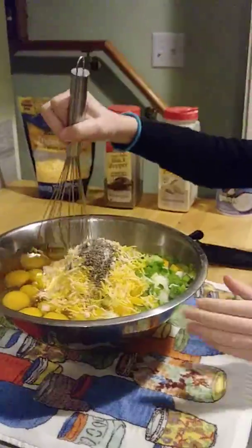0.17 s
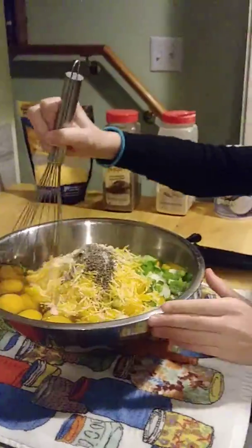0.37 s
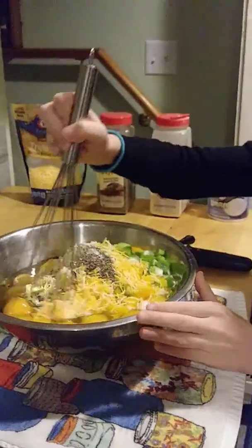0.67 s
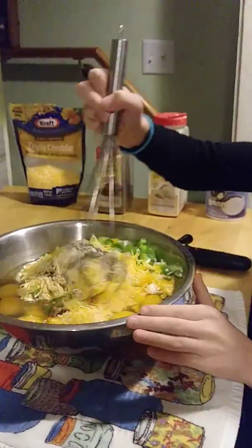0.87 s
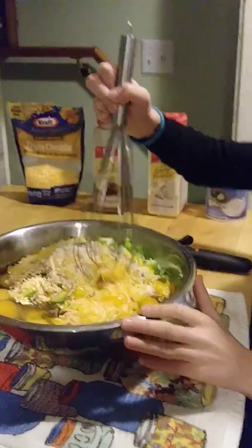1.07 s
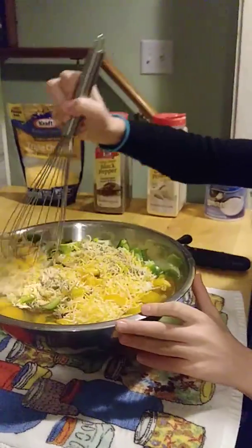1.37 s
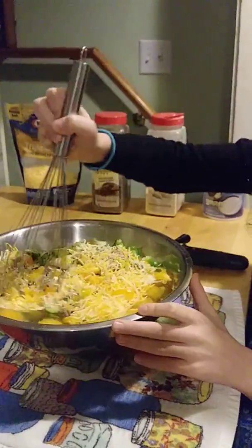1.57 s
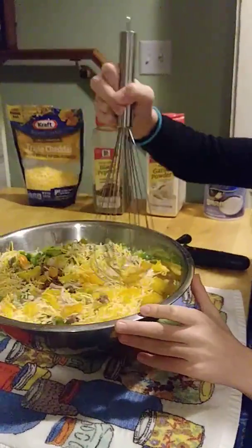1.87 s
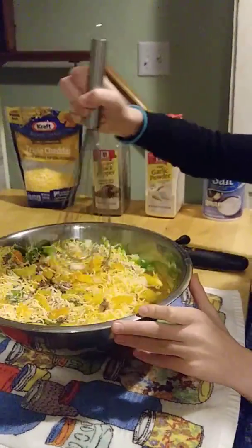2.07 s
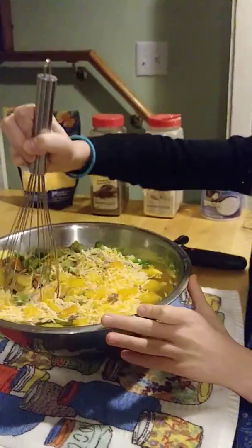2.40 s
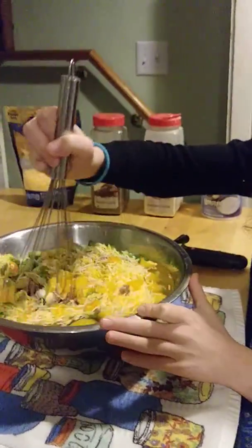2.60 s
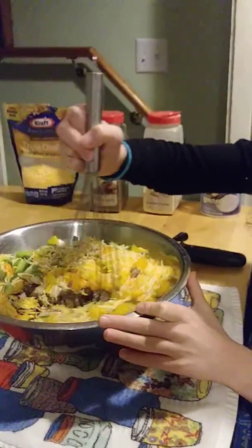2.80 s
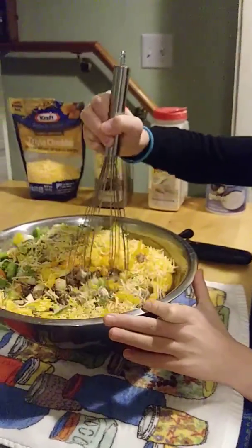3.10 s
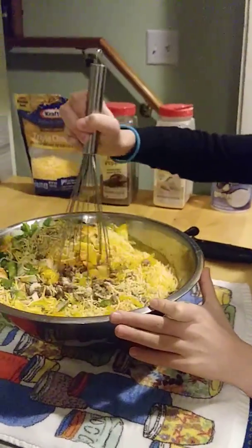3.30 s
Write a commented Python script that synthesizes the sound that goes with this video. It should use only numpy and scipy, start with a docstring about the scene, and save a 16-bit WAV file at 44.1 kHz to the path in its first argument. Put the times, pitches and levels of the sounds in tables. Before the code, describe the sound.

A wire whisk clanks hard against a steel mixing bowl while stirring eggs, with soft wet swishing between.

```python
"""Whisking egg in a steel bowl

A wire whisk stirs egg mixture in a steel bowl in a small kitchen. Hard clinks, sums of dying bowl modes
plus a burst of wire noise, overload the microphone. Dull bumps of the bowl on the table are short low
pulses with resonant noise. Faint scraping is a train of tiny slips ringing the damped bowl, swishing is
hiss with random level patches as a noise suppressor leaves, and slopping is such noise in a wandering
resonance. An appliance hums faintly in sines."""
import sys
import numpy as np
from scipy import signal
from scipy.fft import rfft, irfft
from scipy.io import wavfile
from scipy.ndimage import uniform_filter1d, minimum_filter1d

SR = 44100
rng = np.random.default_rng(int(sys.argv[2]) if len(sys.argv) > 2 else 0)


def undo_db(level):
    """Turn decibels back into plain size, where 20 dB means ten times bigger."""
    steps = np.asarray(level, float) / 20
    return 10 ** steps


def transcribe(u):
    """Save the signal u as a 16-bit wav file named by the first command-line argument.

    u: samples, shape (n,) or (channels, n), limited to [-1, 1]; the rate is SR.
    q: integer samples, one column per channel.
    """
    v = np.clip(np.atleast_2d(u).T, -1, 1)
    q = np.round(v * 32767).astype(np.int16)
    wavfile.write(sys.argv[1], SR, q)


N = 152145
HOLD_S = 0.022  # the last level of a stroke is held this long, up to the next hit


def evened(x):
    """Normalisation: scales a signal to unit rms."""
    return x / np.sqrt(np.mean(x ** 2) + 1e-20)


def read(points, hz):
    """Spectral envelope: interpolates a table on a log-frequency axis."""
    table_hz, value = np.transpose(points)
    return np.interp(np.log(hz + 1), np.log(table_hz + 1), value)


def add(mix, s, sound):
    """Superposition: adds a sound into the mix from a given time on."""
    part = mix[max(round(s * SR), 0):][:len(sound)]
    part += sound[:len(part)]


def level(strokes):
    """Amplitude envelope: gain from the level curves of separate strokes, silent between."""
    t, gain = np.arange(N) / SR, np.zeros(N)
    for stroke in strokes:
        s, db = np.transpose(stroke)[:2]
        sounding = (t > s[0]) * (t < s[-1] + HOLD_S)
        gain += undo_db(np.interp(t, s, db)) * sounding
    return uniform_filter1d(gain, size=300)


def noise(tone, patchy_db, wide, long):
    """Coloured noise: random spectra with level patches, wide in bins and long in frames."""
    real, imaginary, patches = rng.standard_normal((N // 128 + 5, 257, 3)).T
    patches = uniform_filter1d(patches, size=wide, axis=0)
    patches = evened(uniform_filter1d(patches, size=long, axis=1))
    colour_db = read(tone, np.fft.rfftfreq(512, 1 / SR))[:, None]
    spectra = (real + 1j * imaginary) * undo_db(colour_db + patchy_db * patches)
    return evened(signal.istft(spectra, nperseg=512, noverlap=384)[1][:N])


# frequencies at which the spot table is given [Hz]
SPOT_FREQUENCIES = [500, 750, 1270, 1610, 1812, 2150, 3400, 3900, 4340, 4700, 6160, 8750, 12000]
# how strongly a blow at each spot excites the bowl: spot name -> (level [dB], one per frequency above)
SPOT_LEVELS = {"lip": [2, -7, -16, -10, -3.5, -4, -9, -4, 0, 1, 4.5, 6.5, 12], "far": [-5.5, -0.5, -9, -4,
               5.5, -8, 1.5, -6, -7.5, -10.5, -1.5, -1, -0.5], "near": [-27, -17, 3, -5, -16, -0.5, -11, -3,
               -2, -5, -1, 0, 7], "side": [-9, -13, -17, 1, 8, -4.5, -32.5, 15.5, -1, 0.5, 6, 19, 20],
               "brim": [-6, -2, 2.5, -5.5, -4.5, -3.5, -1.5, -3.5, 6, -4.5, 4.5, 1.5, 2.5], "wall": [-2,
               5.5, 5.5, 18, -24.5, 10.5, 3.5, 9, -4.5, -3, 5, 0, 2.5], "low": [-7.5, -1, -9, 10.5, 17.5, 7,
               7, 17.5, -8.5, 12.5, -5.5, 2, -1.5]}


def spot_db(spot, hz):
    """Modal excitation: the point struck decides how strongly each frequency is driven."""
    return read(list(zip(SPOT_FREQUENCIES, SPOT_LEVELS[spot])), hz)


# modes of the bowl: frequency [Hz]
MODE_HZ = [490, 668, 818, 1034, 1200, 1272, 1355, 1610, 1812, 2013, 2104, 2165, 2302, 2520, 2830, 3100,
           3380, 3425, 3895, 3970, 4085, 4342, 4690, 4850, 5155, 5290, 6160, 7520, 8750, 11610, 13150,
           13510, 14820]
# the same modes: (relative level [dB], decay time t60 at damping 1 [s])
MODE_DECAYS = [(-18, .15), (-17, 0.29), (-15.5, 0.21), (-13, 0.17), (-24.5, .2), (2.5, 0.072), (-8, 0.17),
               (-15.5, 0.18), (-9, 0.29), (-30.5, 0.54), (-3.5, 0.18), (-4.5, 0.21), (-23, .3),
               (-15.5, 0.07), (-18.5, 0.19), (-20, 0.16), (0.5, 0.11), (-3, 0.19), (-9, 0.21), (-12, 0.24),
               (-20, .27), (-2.5, 0.1), (-7, 0.2), (-60.5, .2), (-42, 0.54), (-45, .15), (-20.5, .18),
               (-28.5, 0.14), (-38, 0.13), (-42.5, .1), (-41.5, .09), (-45, .09), (-43.5, .1)]
CONTACT_S = 0.000456  # rise time of a blow
# every mode is a close pair, split at random; chance also in how a blow meets each mode
TWIN_HZ, TWIN_SHARE, SPOT_SCATTER_DB = 16, 0.5, 1.5
# faint long after-ring, this many times slower
LINGER_DB, LINGER_SLOWER = -32, 4.27
# random slow wavering roughens the ring; rate for a mode at 1 kHz
WAVER, WAVER_HZ = 0.47, 37.6


def ring(spot, damping):
    """Modal synthesis: the bowl answers one blow with wavering pairs of exponentially dying modes."""
    t, hz = np.arange(SR // 2)[:, None] / SR, np.array(MODE_HZ)
    db, t60 = np.transpose(MODE_DECAYS)
    scatter, split, twin_phase, phase = rng.standard_normal((len(hz), 4)).T
    db = db + spot_db(spot, hz) + SPOT_SCATTER_DB * scatter
    knots = rng.standard_normal((len(hz), 99))
    # higher modes waver faster
    rates = WAVER_HZ * (hz / 1000) ** 0.67
    wander = [np.interp(t[:, 0] * rate, np.arange(99), knot) for rate, knot in zip(rates, knots)]
    waver = 1 + WAVER * np.transpose(wander)
    twin = np.sin(2 * np.pi * ((hz + TWIN_HZ * split) * t + twin_phase))
    pair = np.sin(2 * np.pi * (hz * t + phase)) + TWIN_SHARE * twin
    fall_db = 60 * t * damping / t60
    decay = undo_db(db - fall_db) + undo_db(db + LINGER_DB - fall_db / LINGER_SLOWER)
    rise = np.minimum(t[:, 0] / CONTACT_S, 1)
    fade_out = np.minimum(20 * (0.5 - t[:, 0]), 1)
    return (pair * waver * decay).sum(1) / 4 * rise * fade_out


# blows of the whisk on steel: (time [s], relative level [dB], spot on the bowl)
BLOWS = [(.0, -17, "lip"), (0.6818, -51, "lip"), (2.2701, -0.5, "far"), (2.7846, -1.5, "near"),
         (2.82, -19, "wall"), (3.0508, 0, "brim"), (3.103, -14.5, "brim"), (3.118, -10.5, "near"),
         (3.146, -24, "near"), (3.2668, -6.5, "wall"), (3.291, 4, "wall"), (3.319, 1, "side"),
         (3.343, -3.5, "low"), (3.37, -21, "low"), (3.4167, -1.5, "side")]
# spectrum of wires clashing: (frequency [Hz], relative density [dB per Hz])
CLASH_TONE = [(60, -38.5), (300, -42.5), (690, -14), (1300, -2), (2100, -8.5), (2800, -10), (3900, -2),
              (5000, -12), (6500, -30), (9500, -49), (13000, -45.5), (16000, -49.5)]
CLASH_DB, CLASH_T60_S = -3, 0.064


def clinks():
    """Impact excitation: each blow gives a ring of the bowl and a decaying noise clash of wires."""
    rings, clashes = np.zeros((2, N))
    t, hz = np.arange(8192) / SR, np.fft.rfftfreq(8192, 1 / SR)
    for s, db, spot in BLOWS:
        tone = undo_db(read(CLASH_TONE, hz) + spot_db(spot, hz))
        clash = evened(irfft(rfft(rng.standard_normal(len(t))) * tone))
        decay = undo_db(db + CLASH_DB - 60 * t / CLASH_T60_S)
        add(rings, s, undo_db(db) * ring(spot, damping=0.93))
        add(clashes, s, decay * np.minimum(t / CONTACT_S, 1) * clash)
    return rings, clashes


# bowl bumping the table: (time [s], relative level [dB], pitch [Hz], rise of the rattle [s])
TABLE_BUMPS = [(0.526, -53, 347, 0.012), (.70, -54, 145, 0.0055), (.802, -39, 463, 0.0015),
               (.822, -31, 1300, 0.0012), (0.839, -32.5, 443, 0.0059), (0.859, -41, 320, 0.018),
               (.885, -40.5, 523, 0.0045), (1.5378, -18.5, 650, 0.0026), (1.548, -36.5, 350, 0.011),
               (1.573, -53, 160.5, .01), (0.044, -47, 430, 0.0051)]
BUMP_T60_S, BUMP_TOP_HZ = 0.024, 1944
BUMP_Q, BUMP_BODY_DB = 1.75, -1.5


def bumps():
    """Heavily damped impact: a short low push and a resonant rattle of the table top, without ring."""
    out, t = np.zeros(N), np.arange(4000) / SR
    for s, db, hz, rise in TABLE_BUMPS:
        push = np.sin(2 * np.pi * hz * t) * np.exp(-((t * hz - 1) / 0.5) ** 2)
        rattle = signal.lfilter(*signal.iirpeak(hz, BUMP_Q, fs=SR), rng.standard_normal(len(t)))
        decay = undo_db(BUMP_BODY_DB - 60 * t / BUMP_T60_S)
        add(out, s, undo_db(db) * (push + evened(rattle) * decay * np.minimum(t / rise, 1)))
    return signal.sosfilt(signal.butter(N=8, Wn=BUMP_TOP_HZ, fs=SR, output="sos"), out)


# strokes of wires dragging over steel: (time [s], level [dB])
SCRAPE_STROKES = [
    [(0.15, -61.5), (0.34, -75), (0.36, -58), (0.5, -79.5), (0.536, -52.5), (0.676, -66), (0.684, -60),
     (0.748, -84), (0.79, -68)],
    [(0.95, -61), (0.992, -81), (1.002, -71), (1.042, -91.5), (1.078, -68.5), (1.156, -76), (1.232, -70.5),
     (1.296, -90), (1.35, -90)],
    [(1.37, -97), (1.388, -65), (1.4, -57), (1.412, -64.5), (1.422, -58), (1.44, -63), (1.452, -58),
     (1.526, -79.5), (1.53, -77)],
    [(1.8, -83), (1.85, -86), (1.862, -74), (1.88, -93.5), (1.94, -69), (1.966, -68), (1.976, -77),
     (2.192, -69), (2.245, -78)],
    [(2.5, -49), (2.566, -52), (2.576, -48), (2.59, -45), (2.598, -55), (2.724, -85.5), (2.765, -59)],
    [(2.95, -52), (2.956, -49), (3.035, -56)],
    [(3.2, -51), (3.246, -46.5), (3.255, -43)],
]
# spectrum of the hiss in the scrape: (frequency [Hz], relative density [dB per Hz])
SCRAPE_COLOUR = [(800, -42), (1400, -27), (1790, 2.5), (2340, -2.5), (2900, -30), (6000, -45)]
SLIPS_PER_S, SLIP_SPREAD_DB = 900, 2.5
SCRAPE_RING = 0.7  # share of ring against hiss
SCRAPE_LOW_HZ, SCRAPE_TOP_HZ = 1450, 4600


def scrape():
    """Stick-slip friction: tiny random slips of the wires ring the damped bowl, amid a hiss."""
    sizes = undo_db(SLIP_SPREAD_DB * np.minimum(rng.exponential(1, N), 4))
    slips = sizes * (rng.random(N) < SLIPS_PER_S / SR) * rng.choice([-1., 1.], N)
    # the contact moves on to the next of three spots every 6000 samples
    place = (np.arange(N) // 6000) % 3
    rung = np.zeros(N)
    for k, spot in enumerate(["lip", "low", "far"]):
        rung += signal.oaconvolve(slips * (place == k), ring(spot, damping=2.9))[:N]
    band = signal.butter(N=4, Wn=[SCRAPE_LOW_HZ, SCRAPE_TOP_HZ], btype="band", fs=SR, output="sos")
    rung = evened(signal.sosfilt(band, rung))
    hiss = noise(SCRAPE_COLOUR, 3, wide=3, long=25)
    both = SCRAPE_RING * rung + (1 - SCRAPE_RING) * hiss
    local_rms = np.sqrt(uniform_filter1d(both ** 2, size=3000))
    return level(SCRAPE_STROKES) * both / local_rms


# strokes of the wires hissing through the mixture: (time [s], level [dB])
SWISH_STROKES = [
    [(0.2, -59.5), (0.376, -71), (0.44, -51), (0.484, -60), (0.548, -54), (0.67, -75), (0.692, -64),
     (0.762, -78), (0.792, -59.5), (0.932, -68.5), (0.958, -63), (1.086, -69.5), (1.204, -105),
     (1.256, -76), (1.266, -91), (1.35, -97)],
    [(1.37, -97), (1.378, -81), (1.39, -62), (1.418, -54.5), (1.532, -72.5), (1.544, -58.5), (1.66, -79.5),
     (1.686, -97), (1.75, -97)],
    [(1.85, -97), (1.882, -99), (1.89, -78.5), (1.928, -81), (1.942, -70), (1.97, -76), (2.064, -69),
     (2.082, -84), (2.09, -73), (2.116, -74), (2.168, -72), (2.202, -105), (2.21, -79), (2.245, -93)],
    [(2.45, -54), (2.48, -59.5), (2.578, -56.5), (2.588, -58), (2.748, -61.5), (2.765, -60)],
    [(2.93, -44), (2.936, -63), (3.012, -59), (3.035, -72)],
    [(3.19, -30), (3.196, -55), (3.255, -60)],
]
# spectrum of that hiss: (frequency [Hz], relative density [dB per Hz])
SWISH_COLOUR = [(2000, -17), (2900, -4.5), (4030, 4), (5500, 2), (6500, -14), (8000, -21), (16000, -54)]


def swish():
    """Shaped noise: hiss of the wires through the mixture, with level patches as a noise suppressor leaves."""
    return level(SWISH_STROKES) * noise(SWISH_COLOUR, 3.5, wide=3, long=25)


# strokes of mixture slopping: (time [s], level [dB], pitch [Hz])
SLOP_STROKES = [
    [(0.69, -87.5, 500), (0.714, -82, 507), (0.784, -72, 493), (0.79, -70, 480)],
    [(0.95, -58, 393), (1.012, -80, 441), (1.066, -57.5, 422), (1.138, -71.5, 390), (1.202, -60, 356),
     (1.228, -66, 453), (1.258, -63, 479), (1.32, -94, 455)],
    [(1.39, -74, 530), (1.404, -61, 504), (1.458, -68, 540), (1.502, -72.5, 530), (1.516, -82, 489),
     (1.525, -68.5, 477)],
    [(1.9, -89, 410), (1.936, -78, 467), (1.986, -73, 495), (2.022, -80, 492), (2.076, -56, 453),
     (2.192, -94, 410), (2.226, -73, 390), (2.245, -69, 373)],
    [(2.95, -60, 450), (2.986, -74, 457), (3.002, -60, 464), (3.028, -69, 467), (3.035, -65, 468)],
    [(0.46, -100, 924), (0.466, -101, 936), (0.482, -72, 920), (0.504, -78, 1000), (0.528, -61, 1050),
     (0.548, -62, 1090), (0.66, -91, 1100)],
    [(1.0, -71, 940), (1.032, -57.5, 890), (1.118, -75, 935), (1.148, -89, 941), (1.168, -77, 808),
     (1.21, -73, 1140), (1.3, -88, 812)],
    [(1.37, -93, 845), (1.378, -101, 823), (1.386, -79, 820), (1.4, -60, 765), (1.426, -58, 750),
     (1.514, -79, 800), (1.525, -68, 798)],
    [(2.02, -101, 1160), (2.05, -80, 1240), (2.108, -85, 1174), (2.138, -80, 910), (2.16, -119, 935),
     (2.18, -76, 1060), (2.245, -79, 1030)],
    [(2.45, -44.5, 935), (2.478, -51, 938), (2.496, -52, 890), (2.566, -46.5, 1126), (2.622, -57.5, 1076),
     (2.765, -58, 1170)],
    [(2.95, -56, 1230), (2.964, -56, 1250), (2.98, -73, 1210), (2.994, -42, 1180), (3.035, -66, 1180)],
]
# spectrum of the slopping noise: (frequency [Hz], relative density [dB per Hz])
SLOP_COLOUR = [(150, -92), (280, -11.5), (600, -5), (1200, 4.5), (1700, 10), (4000, -73)]
SLOP_WIDTH_HZ = 246  # bandwidth of each of the two resonator poles
SLOP_BROAD_DB = -9  # unresonated noise against the hollow part


def slop():
    """Resonance: low noise with random level patches, for the slopping mixture, at a wandering hollow pitch."""
    out, t = np.zeros(N), np.arange(N) / SR
    pole = np.exp(-np.pi * SLOP_WIDTH_HZ / SR)
    double_pole = np.convolve([1, -pole], [1, -pole])
    low_noise = noise(SLOP_COLOUR, 3.5, wide=2, long=14)
    for stroke in SLOP_STROKES:
        s, _, hz = np.transpose(stroke)
        # shift the pitch down to 0 Hz, low-pass there, shift back
        carrier = np.exp(2j * np.pi * np.cumsum(np.interp(t, s, hz)) / SR)
        hollow = signal.lfilter([1], double_pole, low_noise / carrier) * carrier
        out += level([stroke]) * (evened(hollow.real) + undo_db(SLOP_BROAD_DB) * low_noise)
    return out


# reverberation of the kitchen: (frequency [Hz], decay time t60 [s])
KITCHEN_DECAYS = [(200, 0.47), (600, 0.24), (2000, 0.28), (5000, 0.26), (12000, 0.13)]


def kitchen(x):
    """Reverberation: sparse echoes of random sign, each band dying at its own speed."""
    taps = np.zeros(SR // 2)
    at = np.arange(120, len(taps) - 20, 20)
    taps[at + rng.integers(0, 20, len(at))] = rng.choice([-1., 1.], len(at))
    hz, t, z = signal.stft(taps, SR, nperseg=256)
    decay = undo_db(-60 * t / read(KITCHEN_DECAYS, hz)[:, None])
    tail = signal.istft(z * decay, SR, nperseg=256)[1]
    return signal.fftconvolve(x, tail / np.linalg.norm(tail))[:N]


# appliance hum ahead of the microphone: (frequency [Hz], level [dB rms])
HUM_TONES = [(60, -61), (120, -75.5), (240, -74)]
# spectrum of the room noise: (frequency [Hz], relative density [dB per Hz])
ROOM_TONE = [(20, 22.5), (60, 24.5), (120, 4), (200, 0), (300, 10), (820, -25.5), (1100, 0.5), (2700, -6),
             (4150, -13), (6000, -8), (8000, -29), (15000, -30)]
ROOM_DB = -75.5  # rms ahead of the microphone


def background():
    """Stationary noise floor: faint coloured room noise and the harmonic hum of an appliance."""
    t, hum = np.arange(N) / SR, np.zeros(N)
    for hz, db in HUM_TONES:
        hum += np.sqrt(2) * undo_db(db) * np.sin(2 * np.pi * (hz * t + rng.random()))
    return hum + undo_db(ROOM_DB) * noise(ROOM_TONE, 2.5, wide=4, long=10)


# less echo for the ring, so the random echoes do not recolour its modes
KNOCK_ECHO_DB, RING_ECHO_DB = -1, -5


def scene():
    """Superposition: blows and bumps, direct and reverberated, over the stirring and background."""
    rings, clashes = clinks()
    knocks = clashes + bumps()
    echo = kitchen(undo_db(KNOCK_ECHO_DB) * knocks + undo_db(RING_ECHO_DB) * rings)
    stirring = scrape() + swish() + slop()
    return (rings + knocks + echo + stirring + background())[None]


MIC_LOW_HZ, EDGE_HZ = 247, 15800  # lower and upper band limits
LIMIT_DB, LIMIT_DB_PER_S = 0.4, 250  # limiter threshold and release rate
OVERLOAD = 0.98  # clipping level


def top_cut(x):
    """Nothing passes above the cut-off."""
    return signal.sosfilt(signal.butter(12, 15800, fs=SR, output="sos"), x)


def record(dry):
    """Microphone overload: thinned bass, a fast limiter, a band limit and hard clipping."""
    x = signal.sosfilt(signal.butter(N=2, Wn=MIC_LOW_HZ, btype="high", fs=SR, output="sos"), dry)
    # peak follower falling at a constant rate
    fall_db = np.arange(N) * LIMIT_DB_PER_S / SR
    peak_db = np.maximum.accumulate(20 * np.log10(abs(x[0]) + 1e-9) + fall_db) - fall_db
    # running maximum of the excess, then smoothed
    over_db = -minimum_filter1d(-np.maximum(peak_db - LIMIT_DB, 0), size=61)
    x = x / undo_db(uniform_filter1d(over_db, size=61))
    low_pass = signal.firwin(511, EDGE_HZ, window=("kaiser", 9), fs=SR)
    x = signal.oaconvolve(x, low_pass[None], "same")
    return top_cut(np.clip(x, -OVERLOAD, OVERLOAD))


dry = scene()
out = record(dry)
transcribe(out)
```